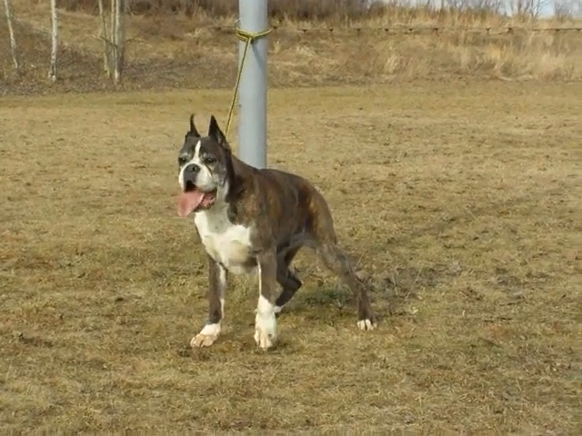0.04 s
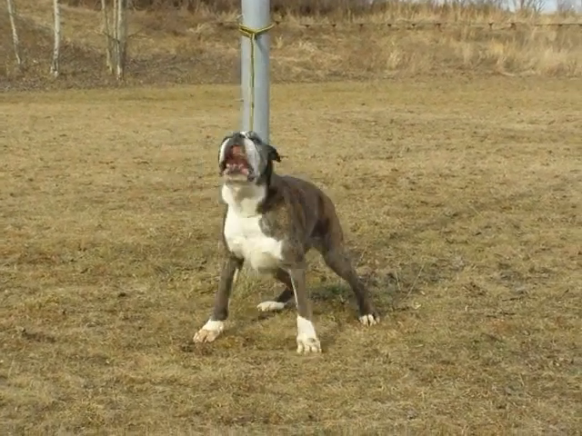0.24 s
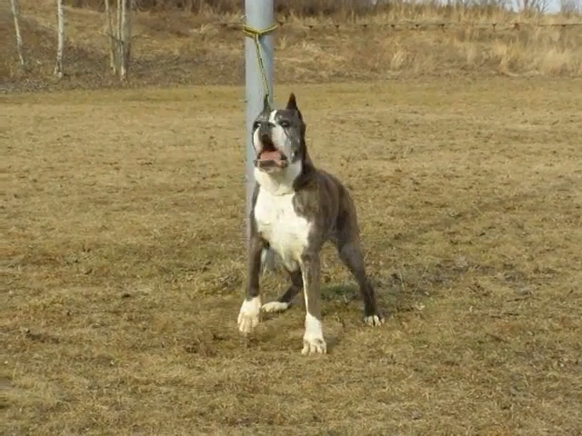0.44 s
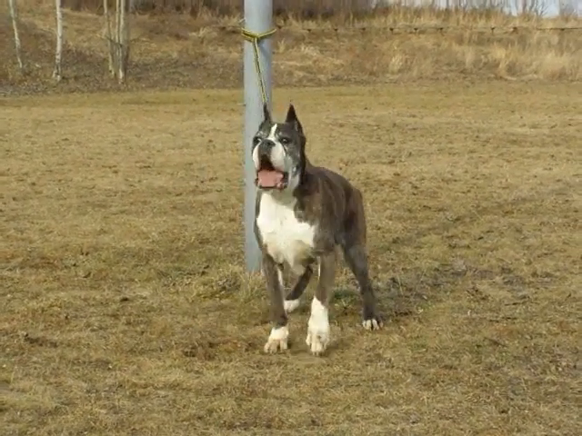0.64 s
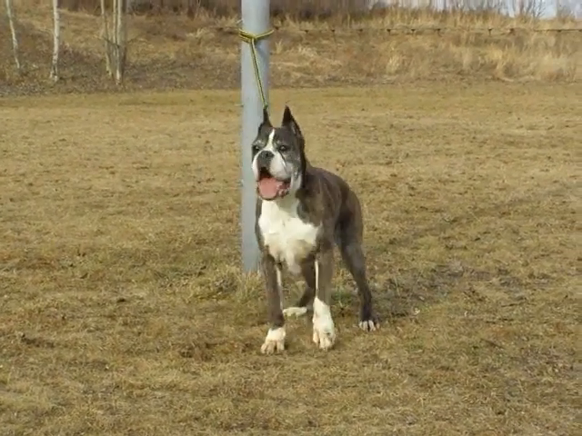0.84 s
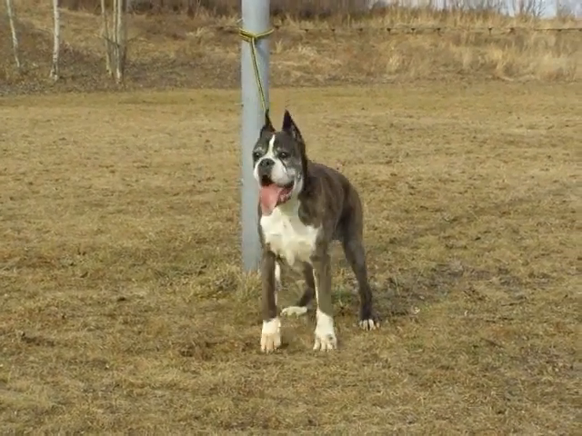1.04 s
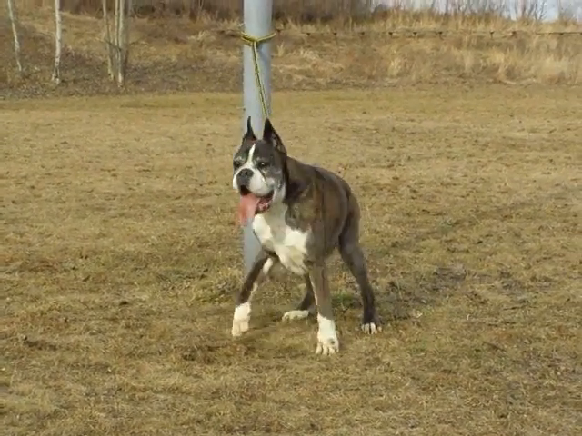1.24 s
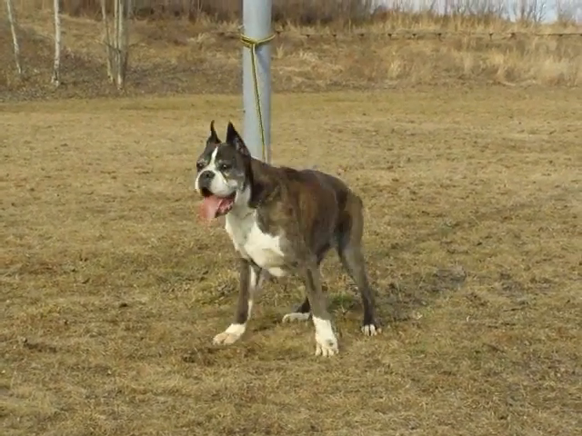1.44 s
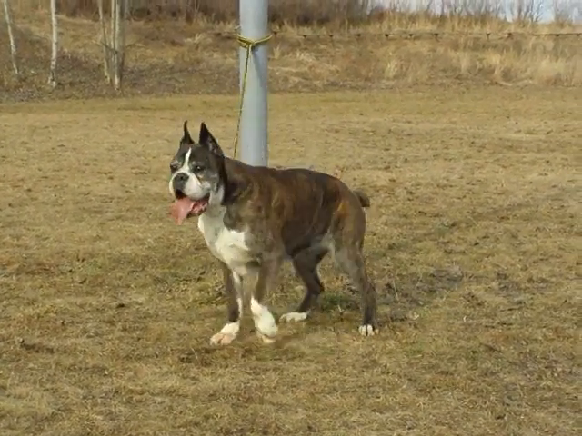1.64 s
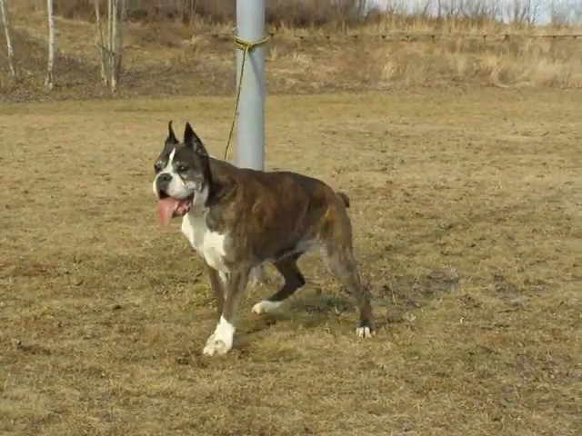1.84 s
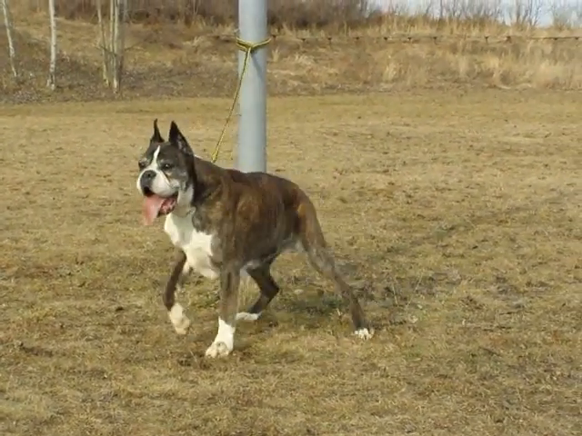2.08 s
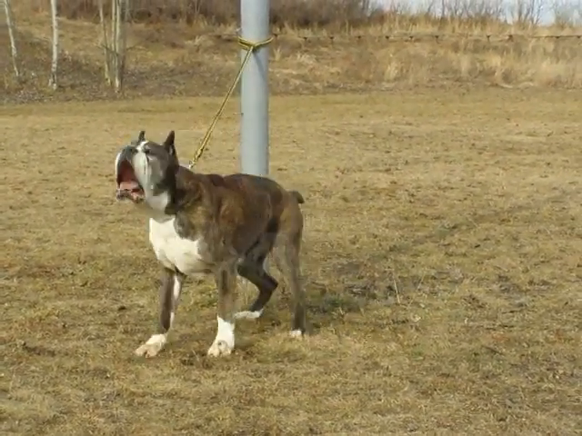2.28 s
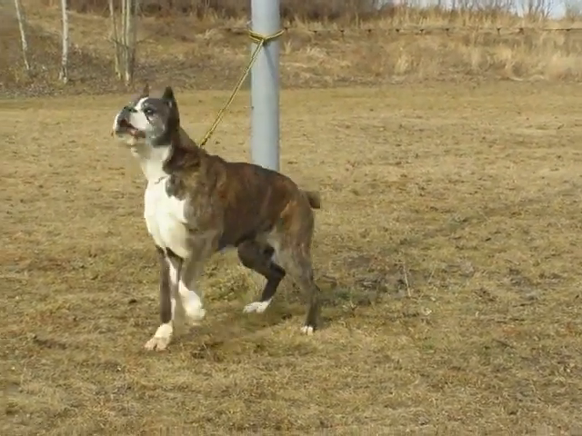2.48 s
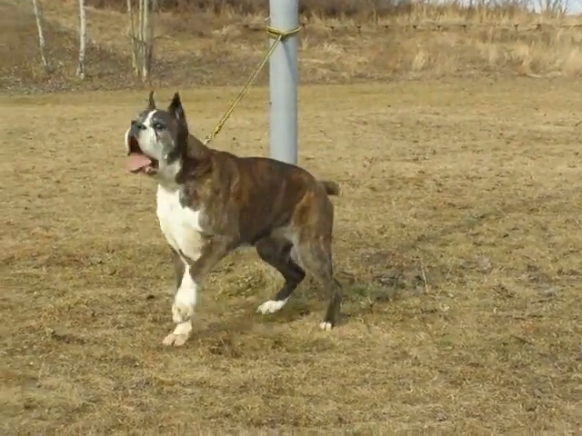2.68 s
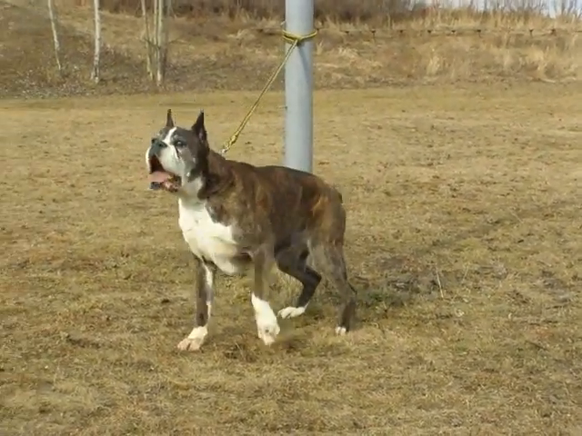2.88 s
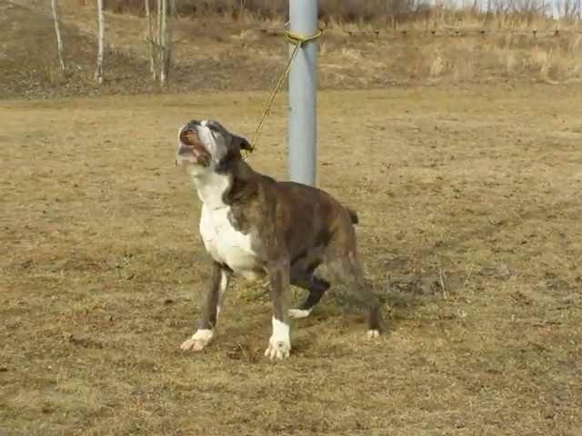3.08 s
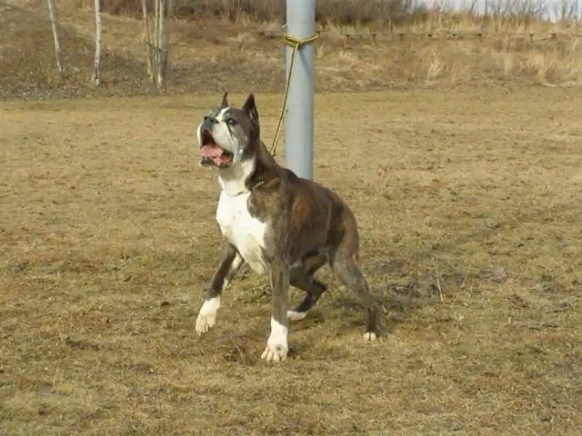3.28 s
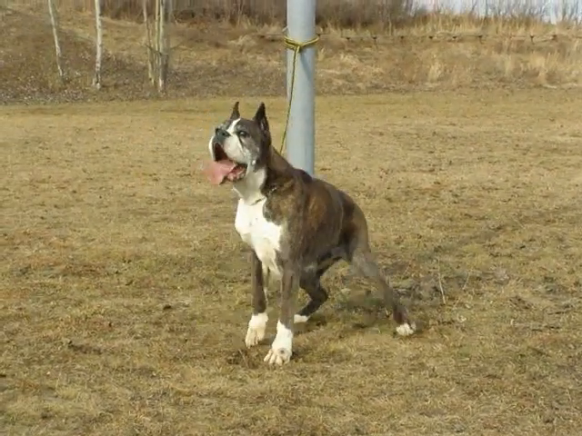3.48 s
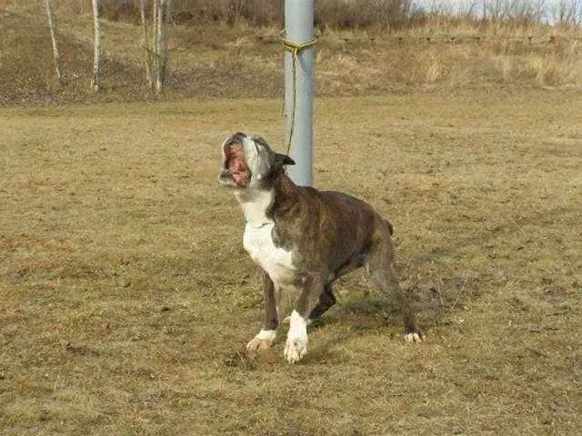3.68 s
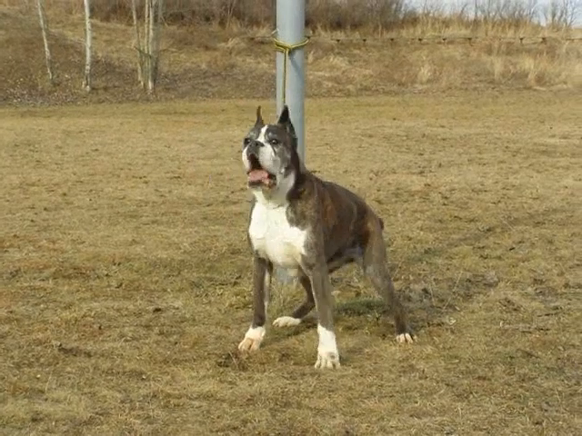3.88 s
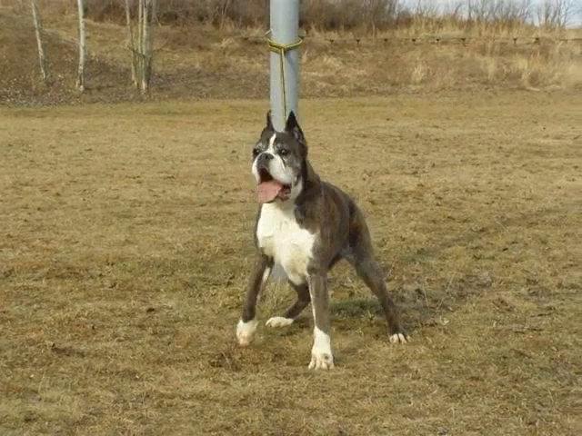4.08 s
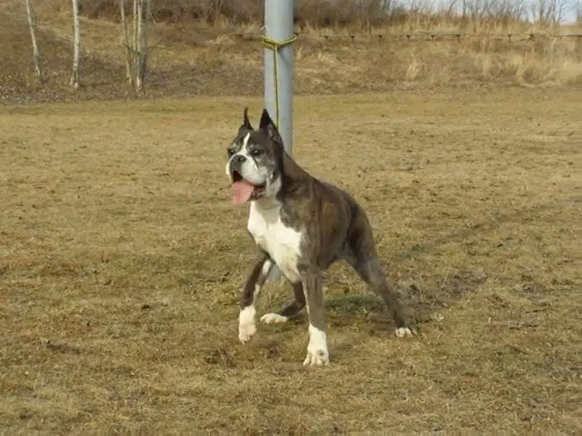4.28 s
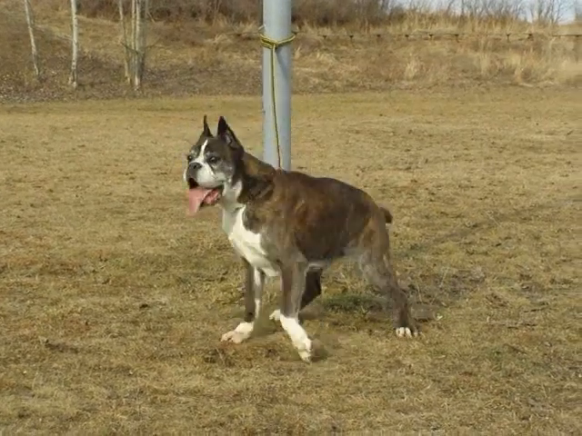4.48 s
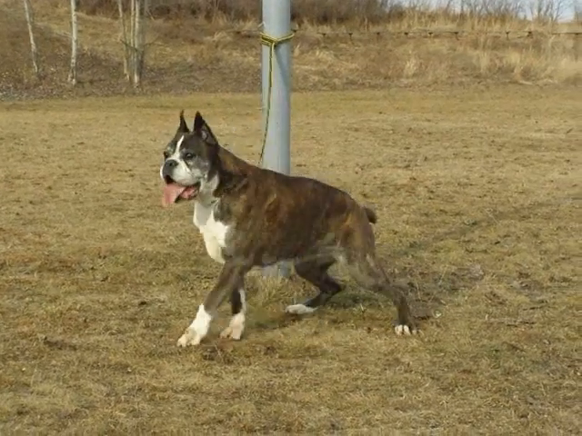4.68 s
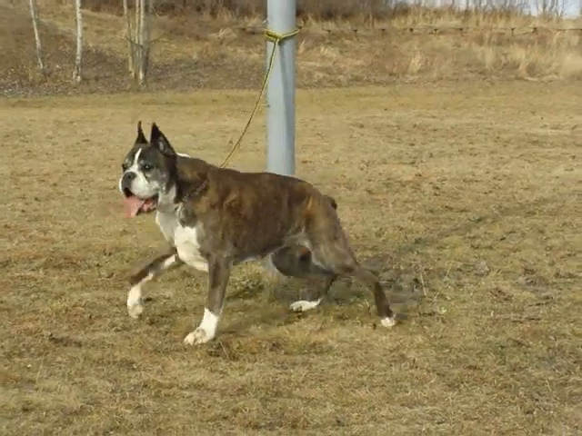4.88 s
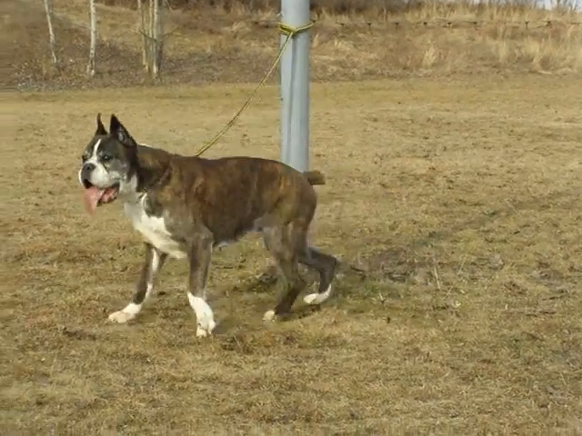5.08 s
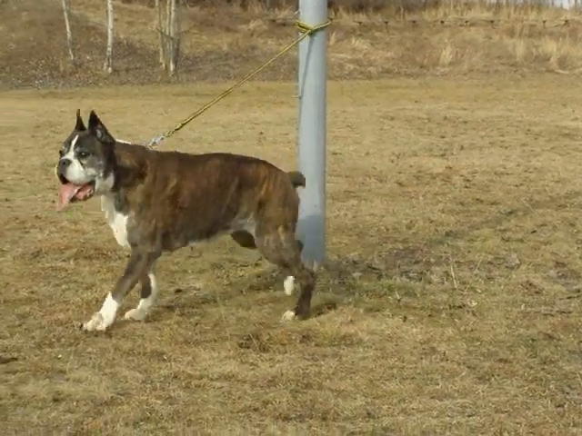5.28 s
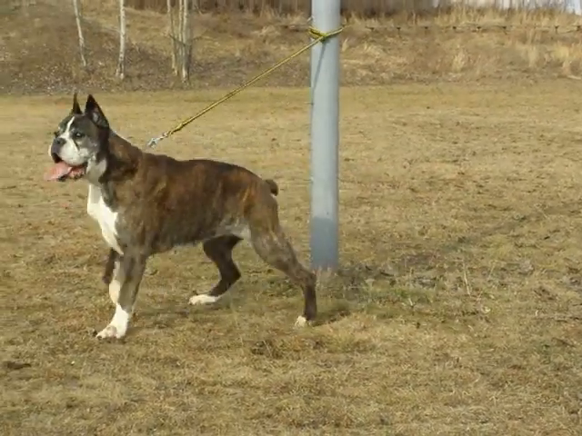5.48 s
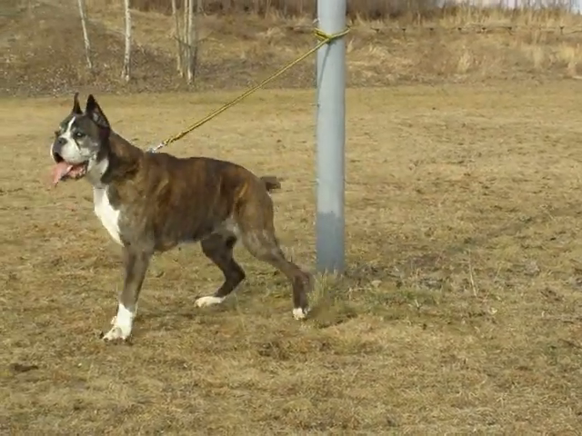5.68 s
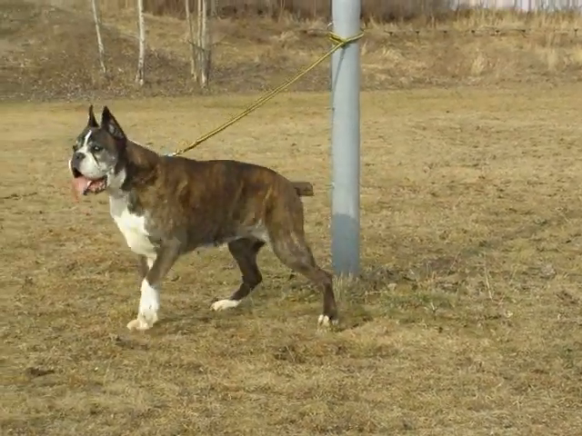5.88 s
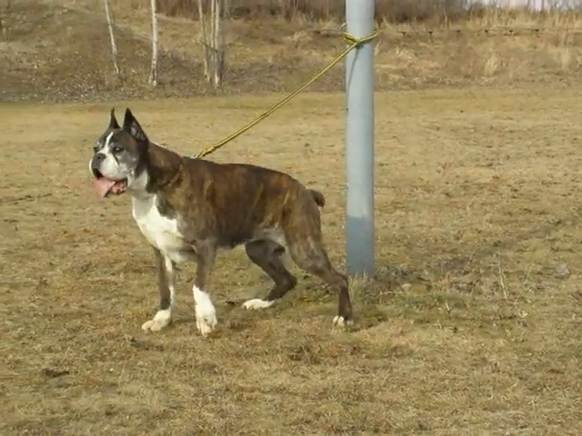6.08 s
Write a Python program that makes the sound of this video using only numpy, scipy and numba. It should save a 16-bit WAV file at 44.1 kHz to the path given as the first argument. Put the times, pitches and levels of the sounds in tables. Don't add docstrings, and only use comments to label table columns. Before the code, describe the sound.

Four short raspy dog barks, each ending in a rattling gasp, with fluttery panting and rumbling wind on a gritty cheap microphone.

```python
import sys
import numpy as np
from scipy import signal
from scipy.fft import rfft, irfft, next_fast_len
from scipy.io import wavfile
from scipy.ndimage import uniform_filter1d, map_coordinates
from numba import njit

SR = 44100
rng = np.random.default_rng(int(sys.argv[2]) if len(sys.argv) > 2 else 0)


def gain_from_db(level_db):
    decades = np.asarray(level_db, float) / 20
    return 10 ** decades


def wav_out(sig):
    wavfile.write(sys.argv[1], SR, np.round(np.clip(np.atleast_2d(sig).T, -1, 1) * 32767).astype(np.int16))


N = 270774
T = np.arange(N) / SR

# (frequency [Hz], density [dB per Hz])
FIELD_SPECTRUM = [(40, -17), (150, -6), (350, 0.5), (700, -3.5), (1500, -10), (2500, -12.5), (3900, -27.5)]
# (frequency [Hz], density [dB per Hz])
RUMBLE_SPECTRUM = [(30, -32), (80, -1.5), (160, 2), (300, -0.5), (600, -45.5)]
# (time [s], half width [s], peak level [dB])
GUSTS = [(0.631, 0.072, -46), (0.99, 0.21, -65.5), (1.45, 0.21, -61), (1.949, 0.11, -53.5),
         (2.48, 0.19, -53), (2.849, .07, -49.5), (3.071, .12, -43), (3.4, 0.22, -52.5), (3.82, 0.21, -56),
         (4.09, .12, -53), (4.46, 0.039, -59.5), (4.69, 0.072, -61), (5.6, 0.25, -59), (6.14, .15, -56.5)]
CALM_DB, GUST_FALL_DB = -69.5, 13
# (time [s], peak level [dB], frequency [Hz])
LOW_PUSHES = [(0.576, -26, 264), (2.921, -38, 216), (2.952, -48.5, 127), (2.984, -35, 253),
              (3.009, -27.5, 271), (3.044, -28.5, 201), (3.055, -24, 204), (3.072, -24.5, 242),
              (3.101, -29.5, 245), (3.112, -33.5, 109.5), (3.124, -36, 342.6), (4.012, -26, 329),
              (4.087, -34.5, 258), (5.527, -37, 249)]

# (start [s], length [s], level [dB], final fall [dB])
PUFFS = [
    (0.309, .026, -35, 25),
    (0.974, .026, -31.5, 13),
    (2.352, .037, -29.5, 15),
    (3.099, .016, -36, 15),
    (3.765, .03, -36, 6),
]
# (start [s], length [s], peak level [dB], peak position [share of length], sag before release [dB])
PANTS = [
    (0.996, 0.18, -30.5, 0.33, 4.5),
    (1.453, 0.17, -34.5, 0.028, 6.5),
    (1.879, 0.2, -37, 0.027, 2.5),
    (4.396, 0.17, -31, 0.11, 7),
    (4.811, 0.17, -34.5, 0.14, 9),
    (5.199, 0.16, -38.5, 0.047, 4.5),
    (5.507, 0.044, -46, .4, 1.5),
    (5.594, 0.18, -39, 0.034, 1),
    (6.043, 0.22, -37.5, 0.24, 15),
]
# (time [s], muzzle resonance [Hz], chest level [dB])
MOUTH_OPENING = [(0.3, 2670, 4), (1.0, 2290, -1), (1.5, 2526, 0.5), (1.95, 2680, 3), (2.36, 2260, 3.5),
                 (3.1, 2520, 7.5), (3.78, 2430, 0), (4.42, 2406, -3), (4.87, 2597, 2), (5.26, 2884, 5.5),
                 (5.66, 2566, 5.5), (6.1, 2790, 3)]
# (centre [Hz], width [Hz], level [dB])
PANT_MOUTH = [(1037, 200, 0.5), (892, 290, -5)]
# (centre [Hz], width [Hz], level [dB])
PANT_MUZZLE = [(1753, 150, 3), (2381, 220, 1), (2913, 180, -12.5)]
RISE_DB, RISE_PER_SHARE_DB = 3.5, 37
RELEASE_AT, RELEASE_DB = 0.68, 16
PANT_BRIGHT_DB, BRIGHT_PER_KHZ_DB = -4, 8
PANT_CHEST_DB, PUFF_CHEST_DB, CHEST_PER_FADE = -8, -13.5, 0.3

# (time [s], pitch [Hz], level [dB], mouth opening as brightness [dB])
RISES = [
    [(0.36, 312.9, -39, -15), (0.372, 329.7, -29.5, -9), (0.386, 352, -22.5, -0.5), (0.393, 370.2, -18, 6),
     (0.412, 455.8, -11.5, 1), (0.422, 426, -44, 0)],
    [(2.409, 265.4, -35.5, -3), (2.435, 318.4, -21, -2.5), (2.45, 352.2, -19, -2),
     (2.457, 364.7, -16.5, 6.5), (2.478, 403.2, -13, 2), (2.492, 435, -19.5, -1)],
    [(3.128, 300.5, -39, 4), (3.138, 329, -30, 1.5), (3.16, 372, -25, 9.5), (3.172, 385.6, -15.5, 2.5),
     (3.188, 454.4, -13, 8), (3.2, 430.6, -23.5, 6.5)],
    [(3.797, 286.3, -39.5, -2), (3.813, 340, -15, 11), (3.837, 450, -16, 3.5), (3.847, 396, -46.5, 17)],
]
# (frequency [Hz], level [dB])
CLEAR_THROAT = [(200, -27), (300, -11.5), (400, 4.5), (700, -1), (1150, 0.5), (1450, -20.5), (1830, -6.5),
                (2150, -16), (2600, -7), (2900, -11.5), (3900, -26)]
# (centre [Hz], width [Hz], level [dB])
BARK_MUZZLE = [(1680, 240, -6.5), (2466, 340, -7.5), (3660, 400, -22.5)]
# (centre [Hz], width [Hz], depth [dB])
POCKET_DIPS = [(1422, 590, -12), (1940, 42, -11), (2990, 390, -12.5)]
FULL_DB = -11
CHEST_AT_TOP_DB, CHEST_PER_DB = -5.5, -0.23

# (break [s], length [s], loudest level [dB], last push [dB], mouth resonance [Hz])
RASPS = [
    (0.422, 0.11, -10.5, -3.5, 925),
    (2.492, 0.13, -11.5, 0, 868),
    (3.198, 0.13, -10.5, -1, 887),
    (3.84, 0.12, -11.5, 2, 910),
]
# (time [share of length], level [dB], part of last push [ratio],
# mouth resonance [ratio], chest level [dB], brightness [dB])
RASP_COURSE = [(0, 4, 0.87, 1.04, 0, 2.5), (.41, -2, 0.36, 1.01, -3, 3.1),
               (0.428, -0.5, 0.02, 1.005, 0.5, -6), (.72, 1, 0.7, .98, -6.5, -0.5),
               (0.931, -11.5, 0.75, 1.3, 3, 0.5), (1.002, -23, 1, 1.015, 1, -12)]
# (chest level [dB], brightness [dB])
POSTURE = [
    (3, 2.5),
    (-5, 0.5),
    (-1, -2),
    (-2, -0.5),
]
# (time [s], pulse rate [Hz])
LOCKS = [
    (0.5, 191),
    (2.54, 189),
    (3.29, 188),
    (3.868, 168),
]
# (centre [Hz], width [Hz], level [dB])
CHEST = [(398.4, 51, -11), (601.6, 130, -3)]
LOOSE, LOCKED = 0.22, 0.66
LOCK_S, DRIFT = 0.02, 0.06

# (start [s], length [s], peak level [dB], mouth opens by [Hz], haste [exponent, over 1 peaks sooner])
GASPS = [
    (0.535, 0.32, -32.5, 223, 1.2),
    (2.616, 0.31, -31, 169, 1.06),
    (3.333, 0.28, -30, 407, 0.8),
    (3.955, 0.28, -30, 197, 0.87),
]
# (time [share of length], level [dB], brightness [dB])
GASP_COURSE = [(0, -8.5, -1), (0.079, -4, -25), (0.221, -0.5, 0), (.48, -5, 8), (.58, -9.5, 2.5),
               (.8, -15, 2.5), (1, -21.5, 2)]
# (centre [Hz], width [Hz], level [dB])
GASP_MUZZLE = [(1640, 180, 3), (2233, 170, 4.5), (3190, 340, 0.5)]
GASP_HZ = 626

# (start [s], length [s], last pitch [Hz], peak level [dB])
GULPS = [
    (0.552, 0.052, 210, -31),
    (2.623, 0.057, 212, -28.5),
    (3.333, 0.058, 167.2, -29.5),
    (3.959, 0.055, 194, -26.5),
]
# (time [share of length], level [dB])
GULP_COURSE = [(0, -11), (.45, -4), (.78, 0), (.9, -5), (1, -20)]
GULP_HZ = 365

# (start [s], length [s], first pitch [Hz], last pitch [Hz], level [dB])
WHIMPERS = [
    (1.2, 0.17, 479, 459, -55),
    (3.623, 0.11, 623, 516, -40.5),
    (5.74, .046, 603.5, 585, -52.5),
    (5.794, 0.15, 192.3, 218.3, -54),
]
WHIMPER_EDGE, WHIMPER_EDGE_DB = 0.051, -6
WHIMPER_ROUGH = 0.35

# (time [s], peak level [dB], frequency [Hz])
CLICKS = [(3.464, -17.5, 860), (3.483, -21, 938), (3.562, -26, 1250), (3.563, -30, 2610), (4.037, -44, 636),
          (4.086, -27.5, 808), (5.122, -40, 904), (5.175, -33, 850), (5.503, -35.5, 2910),
          (5.512, -35.5, 2350)]

CLOCK_HZ, CLOCK_LAG, STEP = 7880.3746, 0.86, 1 / 128
TOP_HZ = 15850


def unit(x):
    return x / np.sqrt(np.mean(x ** 2) + 1e-20)


def along(points, hz):
    f, v = np.transpose(points)
    return np.interp(np.log(hz + 1), np.log(f + 1), v)


def spread(start, length, shape):
    return [(start + u * length, *rest) for u, *rest in shape]


def curves(tables, fade=0.0025):
    gate = np.zeros(N)
    for rows in tables:
        first, last = rows[0][0], rows[-1][0]
        gate += np.interp(T, [first - fade, first, last, last + 0.004], [0, 1, 1, 0])
    s, *cols = np.transpose(sorted(row for rows in tables for row in rows))
    return [np.minimum(gate, 1)] + [np.interp(T, s, c) for c in cols]


def wobble(rate):
    knots = rng.standard_normal(int(N * 400 / SR))
    return map_coordinates(knots, [T * np.clip(rate, 0, 390)])


def filtered(x, response):
    m = next_fast_len(N + 8192)
    return irfft(rfft(x, m) * response(np.fft.rfftfreq(m, 1 / SR)), m)[:N]


def resonant(x, modes):
    def mode(f, c, w, db):
        return gain_from_db(db) * (1j * f * w / (c * c - f * f + 1j * f * w)) ** 2
    return unit(filtered(x, lambda f: sum(mode(f, *m) for m in modes)))


@njit
def glide(x, turn, keep):
    y = np.zeros(len(x))
    for i in range(2, len(x)):
        y[i] = x[i] - x[i - 2] + 2 * keep * turn[i] * y[i - 1] - keep * keep * y[i - 2]
    return y


def mouth(x, centre_hz, width_hz):
    turn = np.cos(2 * np.pi * centre_hz / SR)
    keep = np.exp(-np.pi * width_hz / SR)
    return unit(glide(glide(x, turn, keep), turn, keep))


def flaps(rate, jitter, size_db, breath):
    draw = rng.standard_normal((2, 5000))
    at = np.cumsum(np.exp(jitter * draw[0]) * SR / rate).astype(int)
    inside = at < N
    pulses = np.bincount(at[inside], gain_from_db(size_db * draw[1][inside]), N)
    share = np.clip(breath, 0, 1)
    return np.sqrt(1 - share) * unit(pulses - pulses.mean()) + np.sqrt(share) * rng.standard_normal(N)


def pings(rows, cycles, lift_db):
    out, t = np.zeros(N + 2000), np.arange(2000) / SR
    for s, db, hz in rows:
        u = t * hz / cycles
        push = u * np.exp(1 - u) * np.sin(2 * np.pi * hz * t)
        out[round(s * SR):][:len(t)] += gain_from_db(db + lift_db) * push
    return out[:N]


def pockets(x):
    def notch(f, c, w, db):
        return (c * c - f * f + 1j * f * w * gain_from_db(db)) / (c * c - f * f + 1j * f * w)

    def floor(f, c):
        return (-f * f / (c * c - f * f + 0.9j * f * c)) ** 3

    return filtered(x, lambda f: np.prod([notch(f, *dip) for dip in POCKET_DIPS], axis=0) * floor(f, 300))


def wind_level():
    gusts = [np.maximum(db - CALM_DB - GUST_FALL_DB * np.abs(T - s) / half, 0) for s, half, db in GUSTS]
    return CALM_DB + np.max(gusts, axis=0)


def air():
    hush = unit(filtered(rng.standard_normal(N), lambda f: gain_from_db(along(FIELD_SPECTRUM, f))))
    rumble = filtered(rng.standard_normal(N), lambda f: gain_from_db(along(RUMBLE_SPECTRUM, f)))
    rumble = unit(rumble * gain_from_db(1.5 * wobble(25)))
    hush_gain = gain_from_db(-52.4 + 0.6 * wobble(3))
    wind = hush_gain * hush + gain_from_db(wind_level() + 5.5) * rumble
    return wind + pings(LOW_PUSHES, cycles=0.41, lift_db=3.5)


def panting():
    breaths = []
    for s, length, top, at, sag in PANTS:
        under = [(0, RISE_DB + RISE_PER_SHARE_DB * at), (at, 0), (RELEASE_AT, sag), (1, sag + RELEASE_DB)]
        breaths.append(spread(s, length, [(u, top, db, PANT_CHEST_DB) for u, db in under]))
    for s, length, top, dies in PUFFS:
        under = [(0, 5), (0.13, 0), (0.42, 0.27 * dies), (1, dies)]
        breaths.append(spread(s, length, [(u, top, db, PUFF_CHEST_DB) for u, db in under]))
    gate, top_db, under_db, low_db = curves(breaths)
    _, muzzle_hz, throat_db = curves([MOUTH_OPENING])
    level_db = top_db - under_db
    chest_db = low_db + throat_db + CHEST_PER_FADE * under_db
    bright_db = PANT_BRIGHT_DB + BRIGHT_PER_KHZ_DB * (muzzle_hz - np.mean(muzzle_hz)) / 1000
    source = flaps(rate=120, jitter=0.6, size_db=2.5, breath=0.85)
    source = source * gain_from_db(2.2 * wobble(90) + 1.3 * wobble(45))
    upper = gain_from_db(-7.5) * resonant(source, PANT_MUZZLE) + gain_from_db(-6.0) * mouth(source, muzzle_hz, 600)
    voice = resonant(source, PANT_MOUTH) + gain_from_db(bright_db) * upper
    voice = voice + gain_from_db(np.minimum(chest_db, 0)) * resonant(source, [(518.0, 290, 0)])
    voice = filtered(voice, lambda f: (1 / (1 - (f / 3350) ** 2 + 0.8j * f / 3350)) ** 2)
    return gate * gain_from_db(level_db - 1.04) * voice


def bark_start():
    gate, pitch, level_db, bright_db = curves(RISES, fade=0.002)
    chest_db = CHEST_AT_TOP_DB + CHEST_PER_DB * (level_db - FULL_DB)
    phase = 2 * np.pi * np.cumsum(pitch * (1 + 0.012 * wobble(150))) / SR + 0.045 * wobble(300)
    shimmer_db, leak_db = 2.5, -16
    stack, power = 0, 0
    for k in range(1, 8):
        size_db = along(CLEAR_THROAT, k * pitch) + chest_db * (k == 1) + bright_db * (k > 3)
        size = gain_from_db(size_db + shimmer_db * wobble(90))
        stack = stack + size * np.cos(k * phase + 0.48 * k * k)
        power = power + size * size / 2
    breath = rng.standard_normal(N) * (1 + np.cos(phase))
    leak = gain_from_db(leak_db) * unit(filtered(breath, lambda f: gain_from_db(along(CLEAR_THROAT, f))))
    leak = leak + gain_from_db(bright_db + leak_db + 0.5) * resonant(breath, BARK_MUZZLE)
    return pockets(gate * gain_from_db(level_db) * (stack / np.sqrt(power) + leak))


def bark_rasp():
    rasps = []
    for (s, length, top, push, hz), (chest, bright) in zip(RASPS, POSTURE):
        course = [(u, top + db + part * push, ratio * hz, low + chest, high + bright)
                  for u, db, part, ratio, low, high in RASP_COURSE]
        rasps.append(spread(s, length, course))
    gate, level_db, centre_hz, chest_db, bright_db = curves(rasps, fade=0.014)
    pulse_hz = curves([LOCKS])[1] * (1 + DRIFT * wobble(25))
    near_lock = sum(np.exp(-((T - s) / LOCK_S) ** 4) for s, _ in LOCKS)
    locked = LOOSE + (LOCKED - LOOSE) * near_lock
    steady = np.diff(np.floor(np.cumsum(pulse_hz * (1 + 0.07 * wobble(200))) / SR), prepend=0)
    loose = flaps(rate=380, jitter=0.24, size_db=-3.0, breath=0.27)
    source = np.sqrt(1 - locked) * loose + np.sqrt(locked) * unit(steady)
    voice = mouth(source, centre_hz, 290) + gain_from_db(chest_db - 6) * resonant(source, CHEST)
    voice = voice + gain_from_db(-8.0) * mouth(source, 1.194 * centre_hz, 140)
    voice = voice + gain_from_db(bright_db - 11.0) * resonant(source, BARK_MUZZLE)
    quick, slow = uniform_filter1d(voice ** 2, size=500), uniform_filter1d(voice ** 2, size=3000)
    swing = np.sqrt(np.abs(quick / slow))
    voice = voice / (0.15 + swing) ** 0.7
    return pockets(gate * gain_from_db(level_db - 3.0) * voice)


def gasp():
    gasps = []
    for s, length, top, opens, haste in GASPS:
        course = [(u ** haste, top + db, GASP_HZ + u * opens, bright) for u, db, bright in GASP_COURSE]
        gasps.append(spread(s, length, course))
    gate, level_db, centre_hz, bright_db = curves(gasps)
    source = flaps(rate=170, jitter=0.55, size_db=2, breath=0.75)
    source = source * gain_from_db(1.1 * wobble(90) + 1.3 * wobble(30))
    voice = mouth(source, centre_hz, 640) + gain_from_db(-14.5) * resonant(source, CHEST)
    voice = voice + gain_from_db(bright_db - 12.5) * resonant(source, GASP_MUZZLE)
    return pockets(gate * gain_from_db(level_db + 0.5) * voice)


def gulp():
    gulps = []
    for s, length, hz, top in GULPS:
        course = [(u, GULP_HZ + u * (hz - GULP_HZ), top + db) for u, db in GULP_COURSE]
        gulps.append(spread(s, length, course))
    gate, pitch, level_db = curves(gulps)
    phase = 2 * np.pi * np.cumsum(pitch * (1 + 0.042 * wobble(130))) / SR
    tone = np.sin(phase) + gain_from_db(-13) * np.sin(2 * phase)
    return gate * gain_from_db(level_db + 3 + 1.8 * wobble(120)) * tone


def whimper():
    shape = [(0, WHIMPER_EDGE_DB), (WHIMPER_EDGE, 0), (0.4, -1.5), (1 - WHIMPER_EDGE, -6.5),
             (1, WHIMPER_EDGE_DB)]
    whimpers = []
    for s, length, first, last, top in WHIMPERS:
        course = [(u, first + np.sqrt(u) * (last - first), top + db) for u, db in shape]
        whimpers.append(spread(s, length, course))
    gate, pitch, level_db = curves(whimpers)
    phase = 2 * np.pi * np.cumsum(pitch * (1 + 0.02 * wobble(80))) / SR
    tone = np.sin(phase) + gain_from_db(-13.5) * np.sin(2 * phase)
    tone = tone + gain_from_db(-20 + 5.1 * wobble(30)) * np.sin(3 * phase)
    creak = mouth(flaps(rate=95, jitter=0.2, size_db=1, breath=0.15), pitch, 110)
    voice = np.sqrt(2 - 2 * WHIMPER_ROUGH) * tone + np.sqrt(WHIMPER_ROUGH) * creak
    return gate * gain_from_db(level_db + 1.0) * voice


def mouth_clicks():
    return pings(CLICKS, cycles=1.8, lift_db=-3.0)


def scene():
    bark = bark_start() + bark_rasp() + gasp() + gulp()
    dog = panting() + bark + whimper() + mouth_clicks()
    return (air() + dog)[None]


def roll_off(x):
    return signal.sosfilt(signal.butter(12, 16160, fs=SR, output="sos"), x)


def record(dry):
    def hold_loss(f):
        return (f < CLOCK_HZ / 2) / np.sinc(np.minimum(f / CLOCK_HZ, 0.5))

    tick = np.floor(T * CLOCK_HZ - CLOCK_LAG)
    taken = np.interp((tick + CLOCK_LAG + 0.5) / CLOCK_HZ, T, filtered(dry[0], hold_loss))
    taken = taken / (1 + np.abs(taken / 0.9) ** 5) ** (1 / 5)
    coarse = np.floor(taken / STEP) * STEP
    held = filtered(coarse + STEP / 2, lambda f: f < TOP_HZ) - STEP / 2
    return roll_off(held[None])


dry = scene()
out = record(dry)
wav_out(out)
```